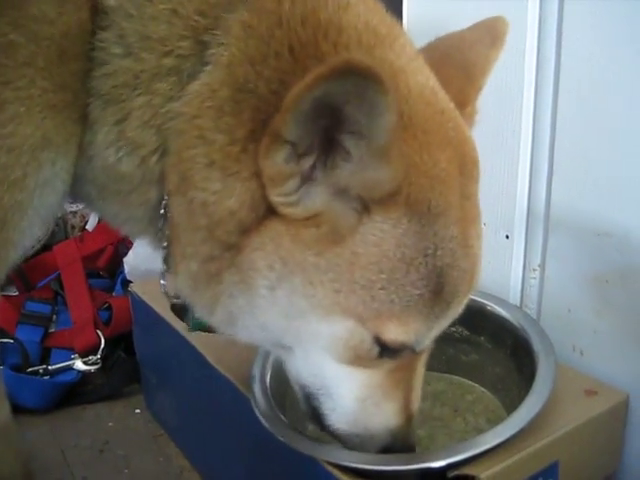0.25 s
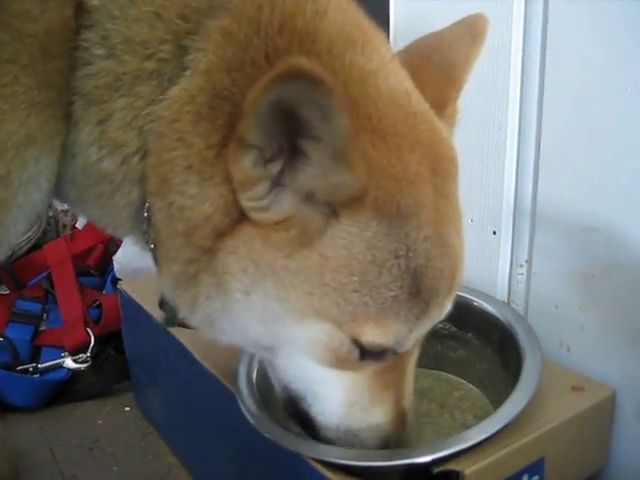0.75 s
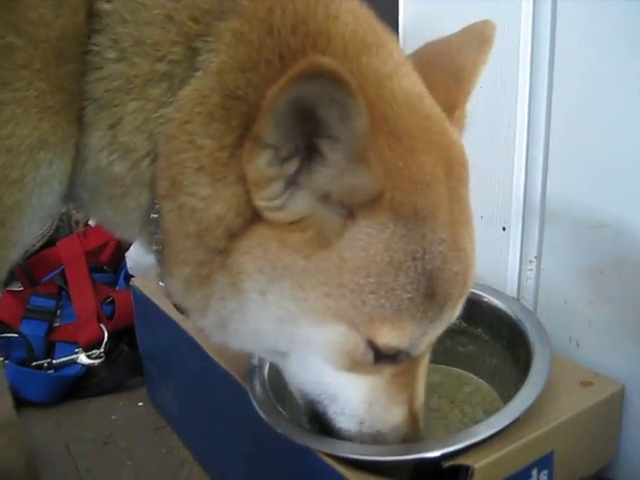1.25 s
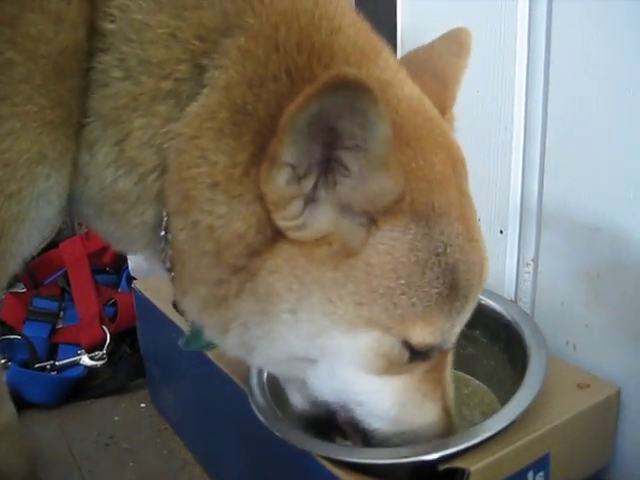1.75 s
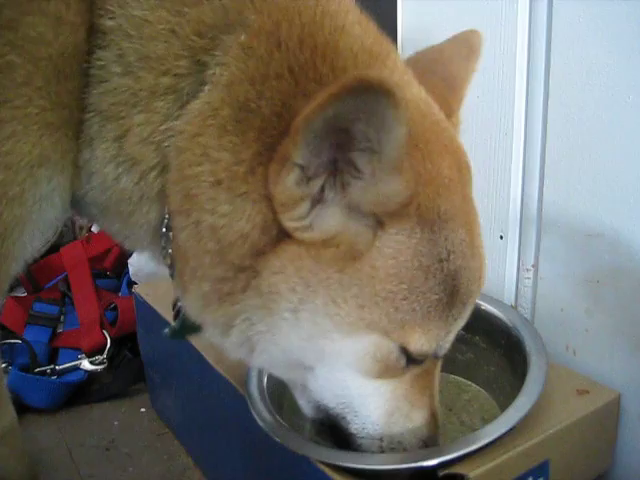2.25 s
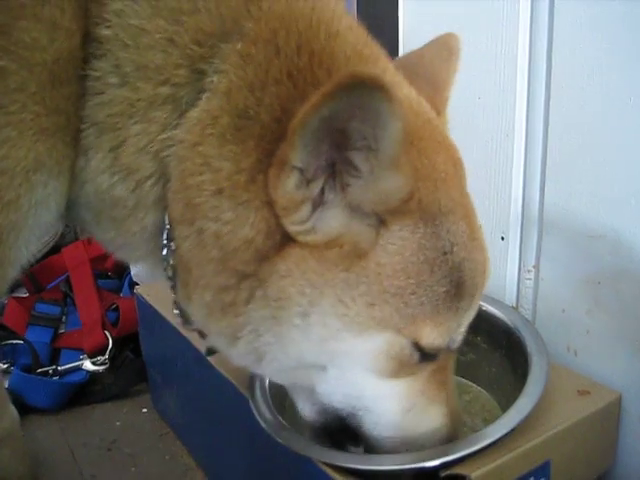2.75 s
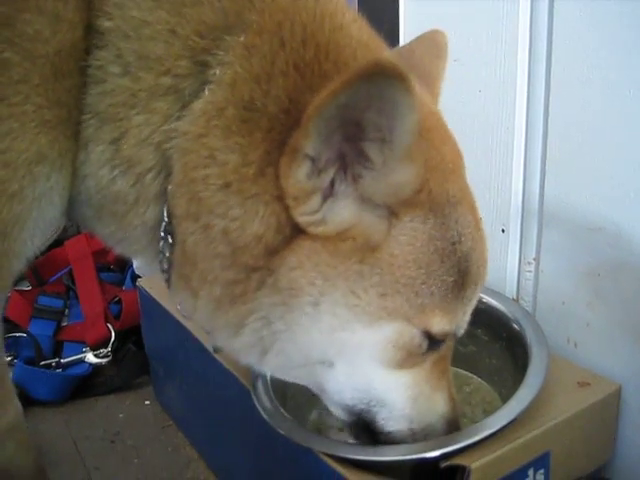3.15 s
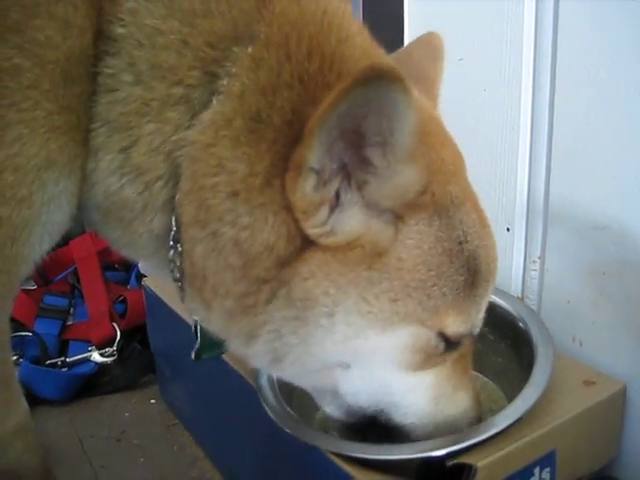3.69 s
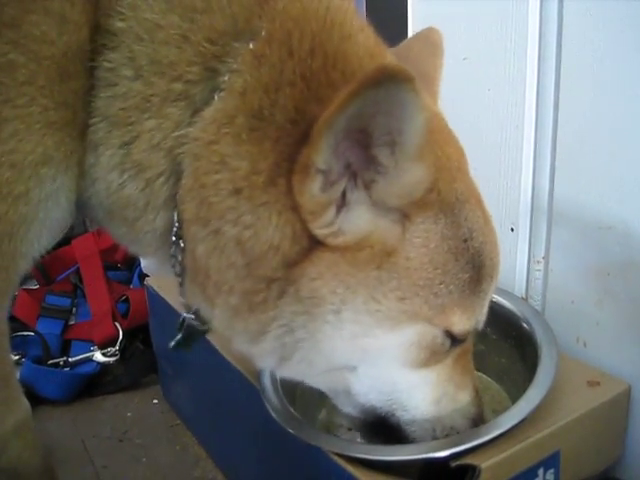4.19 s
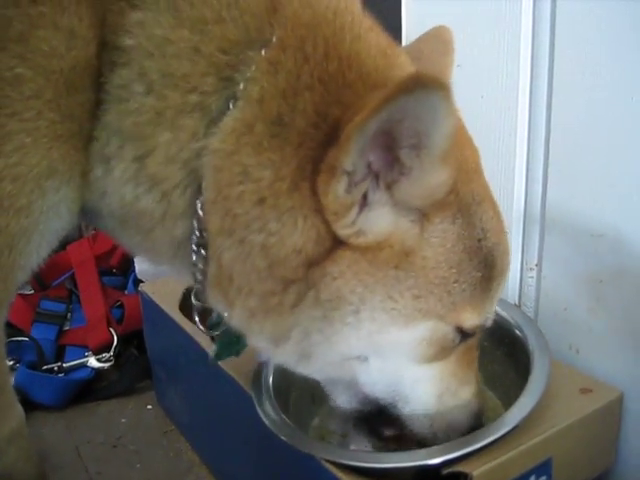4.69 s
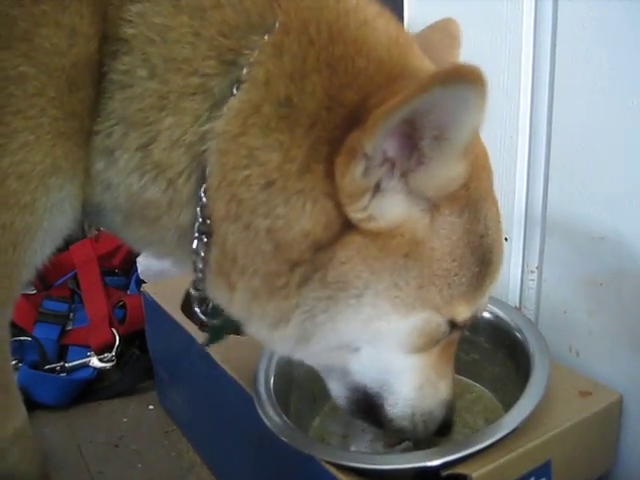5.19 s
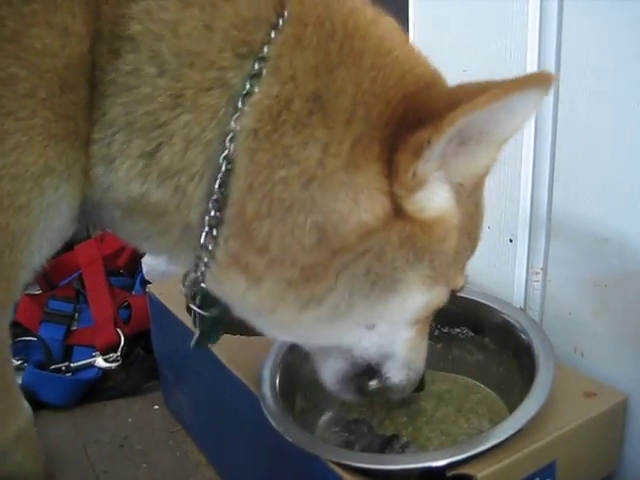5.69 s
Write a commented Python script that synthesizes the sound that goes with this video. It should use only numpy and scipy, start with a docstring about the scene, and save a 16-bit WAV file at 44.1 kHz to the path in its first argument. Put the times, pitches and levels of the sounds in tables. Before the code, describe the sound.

A dog eats soupy food from a metal bowl, very close to a small microphone. Bright ticks and collar rattles come at once, then wet laps about three a second, squelching and popping, with dry clicks of tongue or teeth and a few low soft gulps. The small room adds short weak reflections, faint hiss and hum.

```python
"""A small room, one small microphone: from the start, filtered-noise hiss, steady hum and a faint wet crackle.
At once bright ticks near by: noise cracks, some dry from tongue or teeth, others with the rattle and ringing
modes of collar tags. Then a dog laps wet food from a steel bowl, about three laps a second: resonant noise
squelches, and gliding sines pop as air pockets open. Low gulps, slow licks and clear 5 kHz rings join in.
Dense reflections from bowl and near walls follow the close sounds, much weaker than these."""
import sys
import numpy as np
from scipy import signal
from scipy.io import wavfile

SR = 44100
rng = np.random.default_rng(int(sys.argv[2]) if len(sys.argv) > 2 else 0)


def generate_wav(signal):
    """Clip the signal to [-1, 1] and save it as 16-bit WAV at the path in sys.argv[1]."""
    frames = np.transpose(np.atleast_2d(signal))
    scaled = np.clip(frames, -1, 1) * 32767
    pcm = np.round(scaled).astype(np.int16)
    wavfile.write(sys.argv[1], SR, pcm)


def voltage_ratio(level):
    """Linear amplitude factor for a level in decibels (scalar or array-like)."""
    return 10 ** (np.asarray(level, float) / 20)


N = 261937


def rms_one(x):
    """Scale to an rms of 1."""
    return x / np.sqrt(np.mean(x ** 2) + 1e-20)


def band(x, low_hz, high_hz):
    """Butterworth band-pass."""
    return signal.sosfilt(signal.butter(2, [low_hz, min(high_hz, .45 * SR)], "band", fs=SR, output="sos"), x)


def drift(rate):
    """Slow chance at about the given rate per second: noise through two equal low-passes; rms 1."""
    r = np.exp(-2 * np.pi * rate / SR)
    return rms_one(signal.lfilter([1], [1, -2 * r, r * r], rng.standard_normal(N + SR))[SR:])


def resonance(x, hz, width_hz):
    """Two-pole band-pass with gain 1 on top."""
    r = np.exp(-np.pi * width_hz / SR)
    zeros = np.array([1, 0, -1]) * (1 - r * r) / 2
    return signal.lfilter(zeros, [1, -2 * r * np.cos(2 * np.pi * hz / SR), r * r], x)


def decay(x, t60):
    """Every click leaves a tail that falls 60 dB in t60 seconds."""
    return signal.lfilter([1], [1, -voltage_ratio(-60 / (t60 * SR))], x)


def struck(clicks, hz, t60):
    """A unit click sets a decaying sine of starting height 1 ringing."""
    r, w = voltage_ratio(-60 / (t60 * SR)), 2 * np.pi * hz / SR
    return signal.lfilter([0, np.sin(w)], [1, -2 * r * np.cos(w), r * r], clicks + 1e-18)


def add(out, s, sound):
    """Mix a short sound in at time s."""
    i = round(s * SR)
    out[i:i + len(sound)] += sound[:max(N - i, 0)]


def spikes(s, db):
    """One click per event."""
    clicks = np.zeros(N)
    clicks[np.round(s * SR).astype(int)] = voltage_ratio(db)
    return clicks


# spectrum of the room hiss: (frequency [Hz], relative density [dB per Hz])
HISS_SPECTRUM = [(25, -2), (60, -1), (200, 5), (500, 1), (980, 1), (1400, -2.5), (1800, -2), (5300, -8),
                 (9000, -13.5), (15500, -13)]
HISS_DB = -53   # rms


def hiss():
    """Room hiss: third-octave bands of gently flickering noise."""
    out, edges = 0, 22 * 2 ** np.arange(0, 9.7, 1 / 3)
    white = rng.standard_normal((2, N))   # neighbouring bands take different noise
    table_hz, table_db = np.transpose(HISS_SPECTRUM)
    for k, (low, high) in enumerate(zip(edges, edges[1:])):
        density_db = np.interp(np.log(low * high) / 2, np.log(table_hz), table_db)
        out = out + voltage_ratio(density_db) * band(white[k % 2], low, high)
    return voltage_ratio(HISS_DB) * rms_one(out)


# faint steady tones of the room, mains hum among them: (frequency [Hz], rms level [dB])
STEADY_TONES = [(59.5, -73), (119, -71), (990, -64)]


def hum():
    """Sines of fixed pitch whose levels waver slightly."""
    t = np.arange(N) / SR
    return sum(voltage_ratio(db + 0.5 * drift(19)) * np.sqrt(2) * np.sin(2 * np.pi * hz * t) for hz, db in STEADY_TONES)


def wet_grains(per_s, low_hz, high_hz, cycles):
    """Clicks in clumps, with a long tail of sizes, each ringing briefly at one of ten pitches; rms 1."""
    born = rng.random(N) < per_s * voltage_ratio(6.0 * drift(40)) / SR   # the drift makes the clumps
    sizes = voltage_ratio(4 * np.minimum(rng.exponential(1, N), 3))
    clicks = born * sizes * rng.choice([-1, 1], N)
    dealt = rng.integers(0, 10, N)
    pitches = np.geomspace(low_hz, high_hz, 10)
    rings = sum(struck(clicks * (dealt == k), hz, cycles / hz) for k, hz in enumerate(pitches))
    return rms_one(band(rings, low_hz / 2, high_hz * 2))   # small bubbles move no bass


# mouth and bowl resonances that colour the squelch: (frequency [Hz], width [Hz], relative level [dB])
MOUTH_RESONANCES = [(320, 100, 4), (810, 430, 18), (1840, 150, -31), (3250, 670, 4.5), (4500, 1200, 3),
                    (5740, 500, -30)]


def squelch():
    """Noise through the mouth and bowl resonances, each flickering in level; rms 1."""
    out = np.zeros(N)
    for hz, width_hz, db in MOUTH_RESONANCES:
        out += voltage_ratio(db + 4 * drift(80)) * resonance(rng.standard_normal(N), hz, width_hz)
    return rms_one(out)


# slow licks that only squelch: (time [s], level [dB], length [s])
SLOW_LICKS = [(0.28, -45, 0.033), (0.85, -50, 0.065), (1.102, -28, 0.093), (2.039, -30, .06),
              (2.37, -29, 0.054), (2.95, -50, 0.039), (3.354, -37.5, 0.053), (3.672, -29.5, 0.063),
              (4.088, -33, 0.03), (4.315, -43, 0.029), (4.557, -35, 0.079), (4.685, -31, 0.05),
              (4.998, -26, 0.059), (5.616, -30, 0.045)]
STIR_DB = -2   # how strongly the tongue stirs the food
STIR_TOP_DB = -18   # louder pops than this stir the food no more


def lapping():
    """The tongue presses in just before each pop and leaves the food moving: squelch, bubbles and crackle."""
    s, db = np.transpose(MOUTH_POPS)[:2]
    pushes = spikes(s, np.minimum(db, STIR_TOP_DB))
    smooth = np.exp(-1 / (0.00011 * SR))
    stirred = decay(signal.lfilter([1 - smooth], [1, -smooth], pushes), .14)
    stirred += voltage_ratio(7.5) * decay(pushes[::-1], 0.008)[::-1]   # reversed tail: the press before the pop
    for start, db, length in SLOW_LICKS:
        add(stirred, start, voltage_ratio(db) * np.hanning(round(length * SR)))
    moving = voltage_ratio(-20) * squelch()
    moving += voltage_ratio(-17) * wet_grains(700, 1300, 5500, cycles=20)   # bubbles
    moving += voltage_ratio(-24) * wet_grains(600, 4500, 15000, cycles=30)   # crackle
    faint = voltage_ratio(-59.5) * wet_grains(70, 700, 4500, cycles=20)   # goes on all the time
    faint += voltage_ratio(-63) * wet_grains(70, 5000, 14500, cycles=40)
    return voltage_ratio(STIR_DB) * stirred * moving + faint


# bright ticks: ringing ones from the collar tags, dry ones (ring below about -20 dB) from tongue or teeth:
# (time [s], level [dB], ring against the tick [dB])
BRIGHT_TICKS = [(0.0258, -15, -8.5), (0.0506, -20.5, -10), (0.1067, -32, -14), (0.2543, -20, -37),
                (0.3177, -14, -5.5), (0.3433, -16.5, -6), (0.4132, -15.5, -8.5), (0.5002, -25, -11),
                (0.5605, -12.5, -6.5), (0.6815, -19, -18), (0.6996, -23.5, -5), (0.7451, -14, -34),
                (0.7874, -26, -8.5), (0.9456, -8.5, -27), (1.0177, -16.5, -1), (1.1123, -18.5, -7.5),
                (1.259, -29, -17), (1.3631, -15.5, -15), (1.4076, -26, -5.5), (1.5511, -19, -23),
                (1.6596, -15, -3.5), (1.682, -19, -5.5), (1.7513, -17, -21), (1.8205, -19, -13),
                (1.8558, -17.5, -32), (1.9593, -23.5, -15), (1.99, -28, -22), (2.0404, -24.5, 0),
                (2.2836, -16, -8), (2.3651, -13.5, -6), (2.456, -25, -13), (2.597, -14.5, -16),
                (2.6621, -17, -5.5), (2.7544, -22, -17), (2.8955, -20.5, -6), (2.934, -21, -23),
                (2.989, -24.5, -11), (3.063, -22, -26), (3.0895, -16, -34), (3.2915, -19.5, -19),
                (3.375, -24, -14), (3.6614, -20.5, -1.5), (3.8903, -24, -10), (3.9451, -25, -7.5),
                (3.9818, -14.5, -9.5), (4.112, -21, -26), (4.289, -18, -1.5), (4.311, -14.5, -33),
                (4.5271, -27, -7), (4.577, -28, -2), (4.705, -18, -27), (4.72, -21, -21),
                (4.8987, -19, -14), (5.0219, -13, -29), (5.2765, -21, -6), (5.5521, -27.5, -2),
                (5.5822, -27, -2), (5.5927, -20.5, -4), (5.892, -21, -0.5)]


def with_rebounds():
    """The ticks and, after each, one weaker tick at a chance moment 12 to 50 ms later."""
    s, tick_db, ring_db = np.transpose(BRIGHT_TICKS)
    late, weak = rng.random((len(s), 2)).T
    again = np.minimum(s + .012 + late * (.05 - .012), (N - 1) / SR)
    again_db = tick_db - 9 - 14 * weak
    return np.r_[s, again], np.r_[tick_db, again_db], np.r_[ring_db, ring_db]


# ringing modes of the collar tags: (frequency [Hz], level against the ring [dB], 60 dB decay [s])
COLLAR_TAG_MODES = [(5100, -26, .03), (7368, -20, .07), (8870, -18, .02), (10050, -18, .03),
                    (12460, -13, .08), (12800, -11, .06), (14500, -17, .08)]
FAINT_TICKS_PER_S, FAINT_TICK_DB = 9.0, -30.5   # rate that drifts up and down; level of the strongest click


def bright_ticks():
    """Short noise cracks; the ring level sets how far tags clank, rattle and flutter in their modes after each."""
    s, tick_db, ring_db = with_rebounds()
    ring_db = tick_db + ring_db
    luck = rng.standard_normal((len(s), len(COLLAR_TAG_MODES)))
    t = np.arange(SR // 100) / SR
    # chain links shift now and then
    shifts = rng.random(N) < FAINT_TICKS_PER_S * voltage_ratio(6.0 * drift(3.0)) / SR
    faint = shifts * voltage_ratio(FAINT_TICK_DB - 10 * rng.random(N))
    crack = np.convolve(spikes(s, tick_db - 6) + faint, t / 0.00087 * np.exp(1 - t / 0.0005))[:N]
    clank = np.convolve(spikes(s, ring_db - 2.5), t / 0.0007 * np.exp(1 - t / 0.0007))[:N]
    rattle = decay(spikes(s, ring_db - 11.5), .08)
    contacts = np.sign(rng.standard_normal((3, N)))   # a dense patter of equal contacts
    broad = rms_one(band(contacts[0], 4060, 14100) + voltage_ratio(-10.5) * band(contacts[1], 2200, 5140))
    # close modes of the chain links
    links = rms_one(resonance(resonance(contacts[2], 15100, 1500), 15100, 1500))
    flutter = voltage_ratio(2.5 * drift(85))
    out = crack * broad + clank * links + rattle * flutter * (voltage_ratio(-4) * broad + links)
    for k, (hz, db, t60) in enumerate(COLLAR_TAG_MODES):
        strength = ring_db + db + 4 * luck[:, k]
        out += struck(spikes(s, strength), hz, t60) * (1 + .7 * drift(100))
    return out


def pop(t, hz, cycles, rise, attack_s, phase):
    """A cavity opens: a sine that swells, glides up in pitch and falls 60 dB in the given cycles."""
    shape = (1 - np.exp(-t / attack_s)) ** 2 * voltage_ratio(-60 * t * hz / cycles)
    return shape / shape.max() * np.sin(2 * np.pi * hz * (t + rise * t * t) + phase)


# air pockets popping in mouth and food: (time [s], level [dB], cavity pitch [Hz])
MOUTH_POPS = [(0.122, -24.5, 1910), (0.221, -26, 3250), (0.255, -30, 1720), (0.499, -32, 4270),
              (0.523, -20.5, 1665), (0.53, -23.5, 3540), (0.604, -26.5, 834), (0.633, -15, 3240),
              (0.663, -29, 1690), (0.815, -23.5, 5230), (0.825, -21.5, 3250), (0.927, -30, 3470),
              (0.946, -20, 3260), (1.162, -33.5, 1180), (1.234, -21, 3400), (1.271, -38, 3230),
              (1.281, -27, 3020), (1.433, -23.5, 2770), (1.449, -29, 1370), (1.549, -19, 4250),
              (1.65, -28.5, 1830), (1.854, -18, 1830), (1.88, -19, 4000), (2.091, -32.5, 1600),
              (2.167, -21, 1900), (2.185, -30.5, 1750), (2.357, -29, 3250), (2.393, -33, 1260),
              (2.476, -28.5, 1830), (2.493, -22.5, 1630), (2.511, -23.5, 1780), (2.759, -25.5, 4370),
              (2.866, -25, 4970), (2.874, -23, 1680), (2.893, -28, 1920), (2.918, -32.5, 1880),
              (2.959, -28.5, 3400), (2.968, -35, 980), (3.076, -25.5, 4200), (3.133, -28, 4160),
              (3.174, -24.5, 1980), (3.21, -38.5, 1280), (3.217, -32.5, 2900), (3.355, -32.5, 3300),
              (3.384, -33, 4130), (3.474, -25, 3250), (3.5, -31, 1750), (3.671, -31, 3000),
              (3.775, -28, 3500), (3.804, -25.5, 1660), (3.705, -39.5, 1180), (4.092, -25.5, 2320),
              (4.104, -24.5, 1700), (4.113, -35.5, 1520), (4.131, -38.5, 1110), (4.311, -16, 4360),
              (4.417, -26.5, 3540), (4.43, -25.5, 1460), (4.443, -43, 3430), (4.651, -37.5, 1580),
              (4.732, -33.5, 3450), (4.921, -23.5, 5870), (4.931, -27.5, 1640), (5, -30, 5300),
              (5.126, -28, 3370), (5.138, -32, 1710), (5.229, -28.5, 1170), (5.331, -29.5, 3580),
              (5.344, -26.5, 4700), (5.449, -28.5, 1810), (5.837, -32.5, 4680), (5.932, -31.5, 1190)]
# two common resonances of mouth and bowl: pitch [Hz], level against the pop [dB]
DEEP, BRIGHT = (1813, -13.5), (3247, -3.5)
DEEP_BELOW_HZ = 2500   # pops under this pitch wake the bright resonance, the others the deep one
# smaller pops that follow: longest chance delay, loss, chance further loss, loss with delay
STRAGGLE_S, STRAGGLE_LOSS_DB, STRAGGLE_SPREAD_DB, STRAGGLE_DB_PER_S = 0.029, 4, 6.5, 354
SNAP_DB, SNAP_S = -8.5, 0.0018   # broad snap: starting rms against the pop, decay constant


def pops():
    """Each pop sounds its cavity, a common resonance and a snap of tearing saliva; four smaller ones straggle."""
    out, t = np.zeros(N), np.arange(SR // 25) / SR
    luck = rng.random((len(MOUTH_POPS), 5, 6))
    noise = rms_one(band(rng.standard_normal((40, len(t))), 2100, 11700))
    snaps = voltage_ratio(SNAP_DB) * noise * np.exp(-t / SNAP_S)
    for (s, db, hz), draws in zip(MOUTH_POPS, luck):
        other_hz, other_db = BRIGHT if hz < DEEP_BELOW_HZ else DEEP
        for k, (phase, other_phase, late, weak, shift, other_shift) in enumerate(draws):
            after = k > 0   # the first is the pop itself, unshifted
            own_pitch = hz * 2 ** (after * .5 * (shift - .5))
            other_pitch = other_hz * 2 ** (after * .5 * (other_shift - .5))
            own = pop(t, own_pitch, 22, 2, .0005, 2 * np.pi * phase)
            other = pop(t, other_pitch, 22, 2, .0006, 2 * np.pi * other_phase)
            snap = snaps[int(phase * len(snaps))]
            delay = late * STRAGGLE_S
            loss_db = STRAGGLE_LOSS_DB + STRAGGLE_SPREAD_DB * weak + STRAGGLE_DB_PER_S * delay
            sound = voltage_ratio(db - after * loss_db) * (own + voltage_ratio(other_db) * other + snap)
            add(out, s + after * (0.0022 + delay), sound)
    return out


# low gulps of the tongue: (time [s], level [dB], pitch [Hz])
TONGUE_GULPS = [(0.284, -47, 494), (0.3, -34.5, 279), (0.84, -43, 660), (2.075, -48, 440),
                (2.164, -42.5, 253), (2.286, -44.5, 417), (2.472, -45, 258), (2.915, -46.5, 246),
                (3.47, -42, 259), (4.329, -38, 468), (4.863, -45, 280), (5.029, -41.5, 604),
                (5.119, -47, 273), (5.431, -43, 260)]


def gulps():
    """A low, slowly swelling pop with a short slosh of noise."""
    out, t = np.zeros(N), np.arange(SR // 25) / SR
    for s, db, hz in TONGUE_GULPS:
        noise = rms_one(band(rng.standard_normal(len(t)), 290, 1100))
        slosh = noise * t / 0.0077 * np.exp(1 - t / 0.007)
        add(out, s, voltage_ratio(db) * (pop(t, hz, 9.9, 0.28, 0.0065, 0) + voltage_ratio(-4.5) * slosh))
    return out


# clear 5 kHz ring of some collar clinks: (time [s], level [dB], length [s])
CLINK_RINGS = [(0.407, -42.5, 0.031), (0.563, -32.5, 0.035), (1.016, -33.5, 0.014), (2.896, -51, 0.051),
               (2.987, -41, 0.025), (5.275, -47, 0.018), (5.578, -48, 0.036), (5.894, -49, 0.02)]
CLINK_RING_HZ = 4958


def clink_rings():
    """A sine that hardly decays and then stops short with a 6.4 ms fade."""
    out = np.zeros(N)
    for start, db, length in CLINK_RINGS:
        t = np.arange(round(length * SR)) / SR
        fade = np.minimum(1, (length - t) / 0.0064)
        add(out, start, voltage_ratio(db - 60 * t / 1.2) * fade * np.sin(2 * np.pi * CLINK_RING_HZ * t))
    return out


def room(x, t60):
    """Dense reflections from bowl, box and near walls: noise that dies."""
    t = np.arange(SR // 4) / SR
    tail = rng.standard_normal(len(t)) * voltage_ratio(-60 * t / t60) * (t > .002)
    return signal.fftconvolve(x, tail / np.sqrt(np.sum(tail ** 2)))[:N]


def scene():
    """The close sounds, their weak reflections, and the room's own hiss and hum."""
    near = lapping() + bright_ticks() + pops() + gulps() + clink_rings()
    echo = voltage_ratio(-18) * room(near, t60=.12)
    return (near + echo + hiss() + hum())[None]


def top_cut(x):
    """Nothing passes above the cut-off."""
    return signal.sosfilt(signal.butter(12, 16970, fs=SR, output="sos"), x)


NOTCH_HZ, NOTCH_WIDTH_HZ, CUTOFF_HZ = 7880, 1200, 15900


def record(dry):
    """The small microphone's housing notches the treble near 8 kHz and the top is cut steeply."""
    x = dry - resonance(dry, NOTCH_HZ, NOTCH_WIDTH_HZ)
    x = x - resonance(x, NOTCH_HZ + 80, NOTCH_WIDTH_HZ / 3)   # a second, narrower notch
    x = signal.sosfilt(signal.ellip(10, .5, 40, CUTOFF_HZ, fs=SR, output="sos"), x)
    return top_cut(x)


dry = scene()
out = record(dry)
generate_wav(out)
```